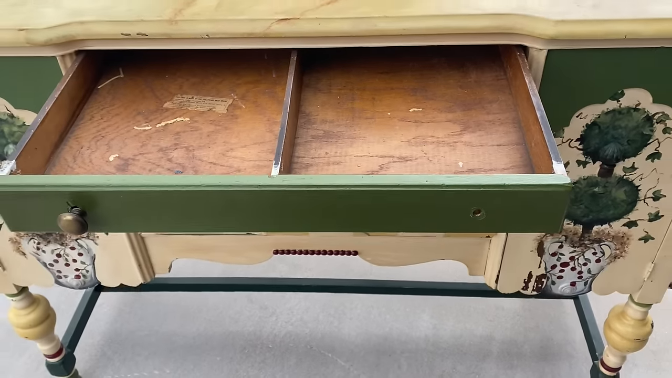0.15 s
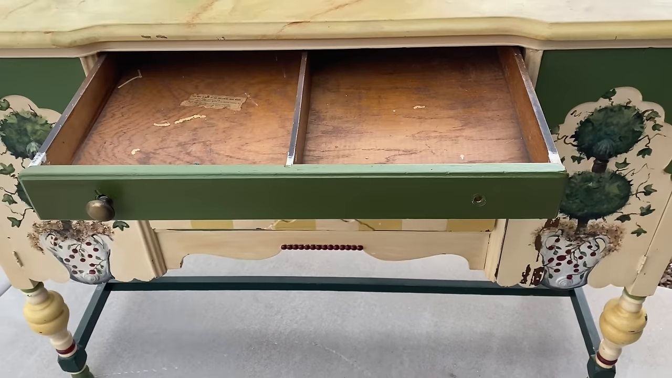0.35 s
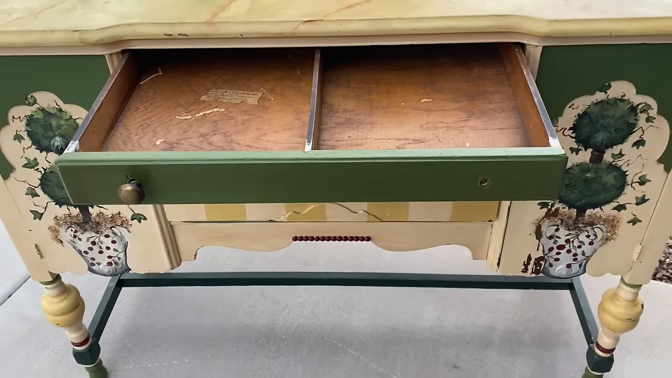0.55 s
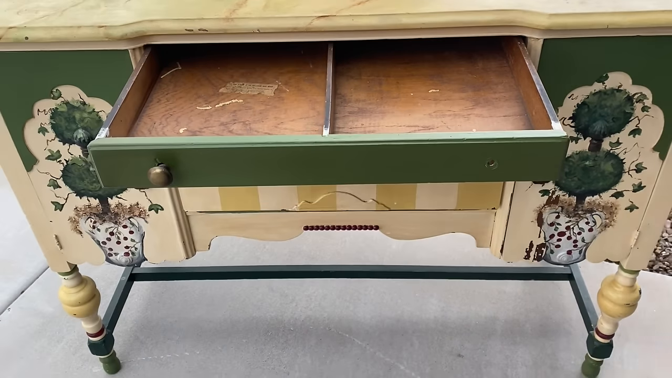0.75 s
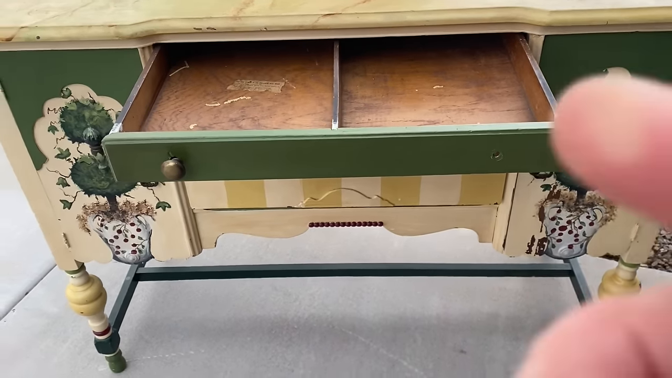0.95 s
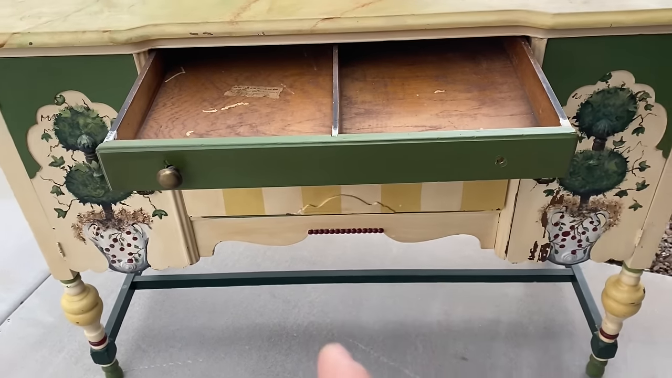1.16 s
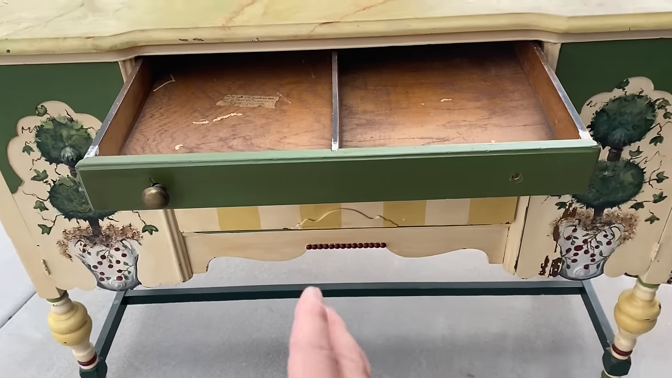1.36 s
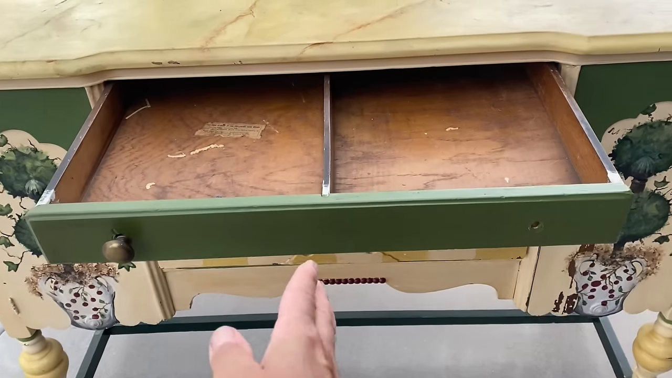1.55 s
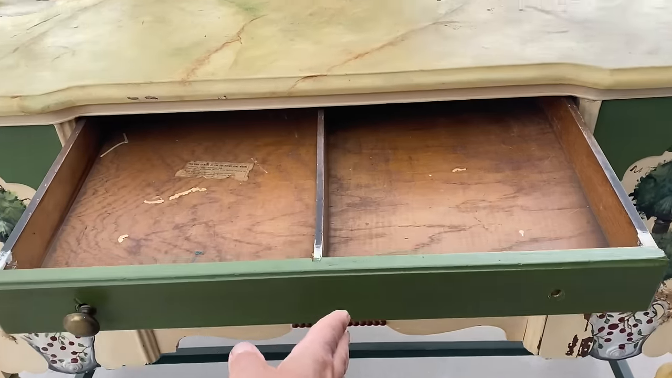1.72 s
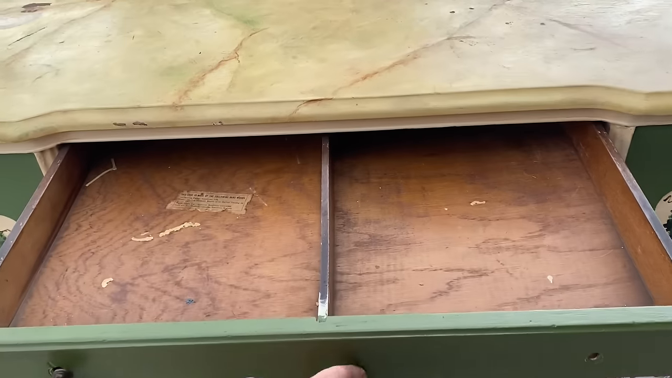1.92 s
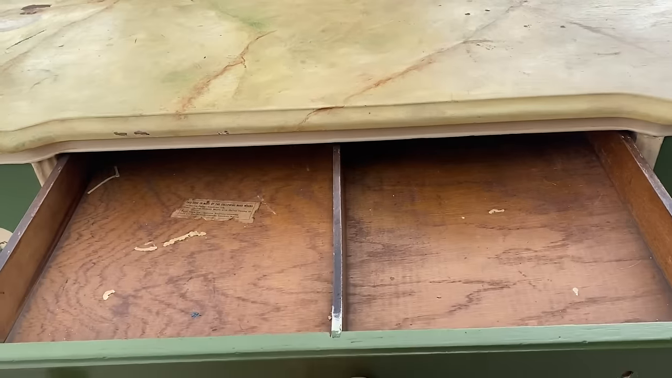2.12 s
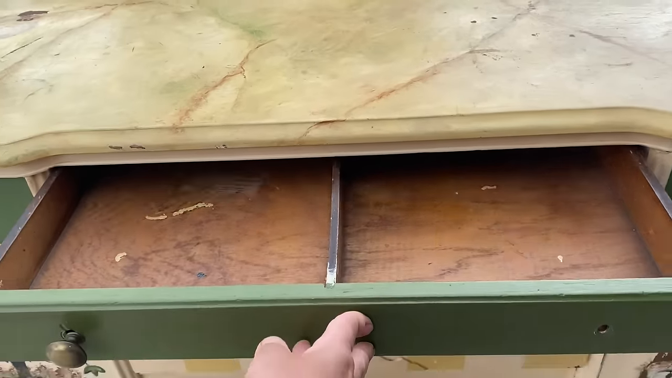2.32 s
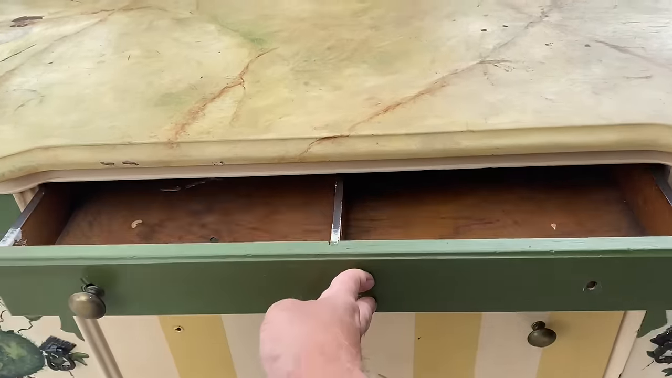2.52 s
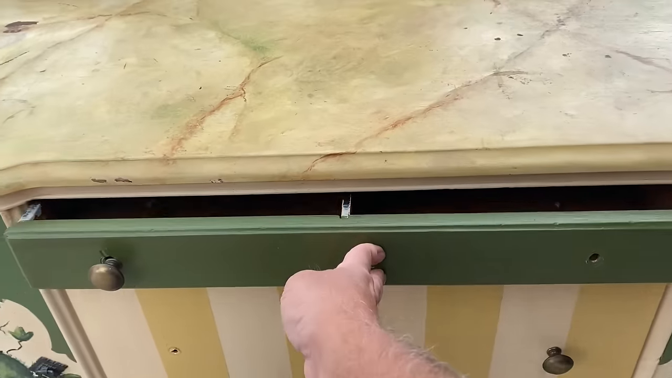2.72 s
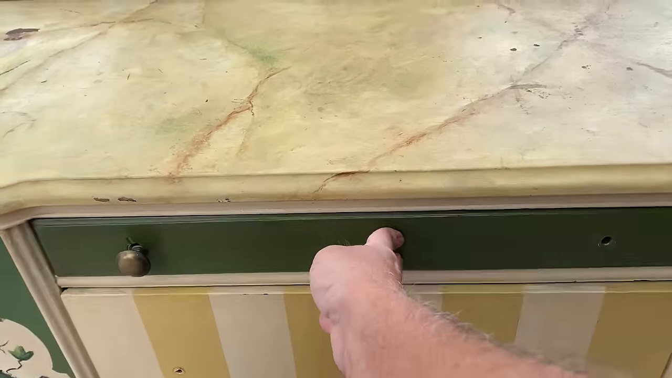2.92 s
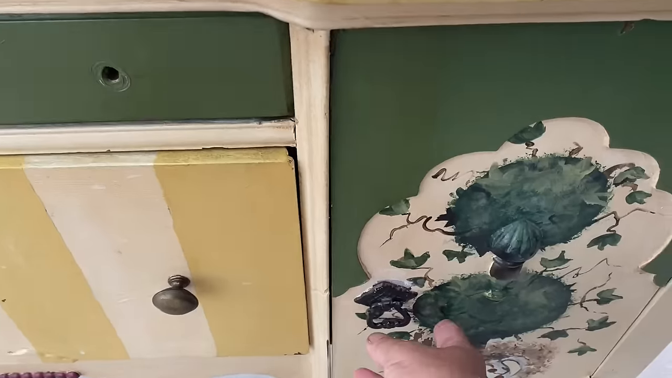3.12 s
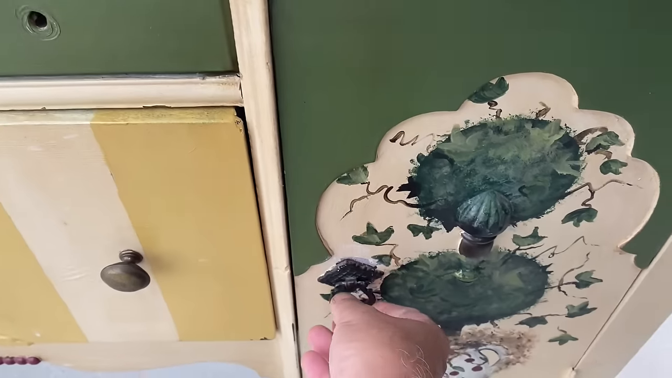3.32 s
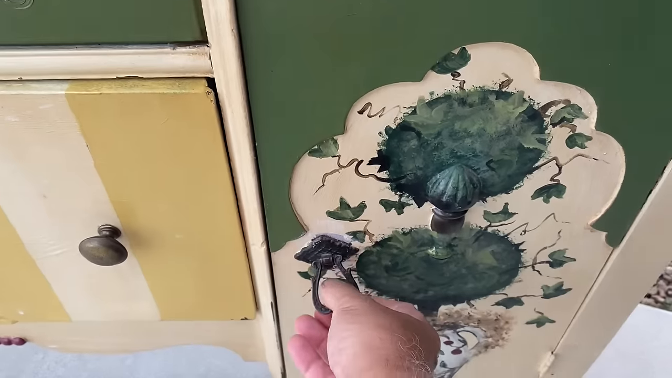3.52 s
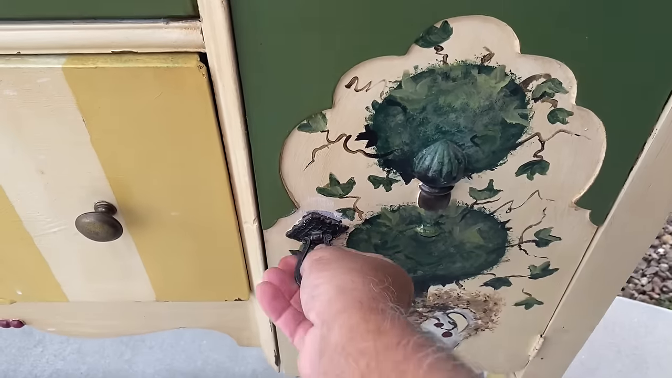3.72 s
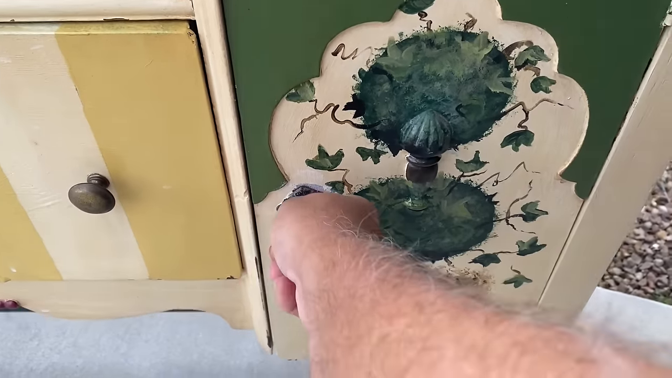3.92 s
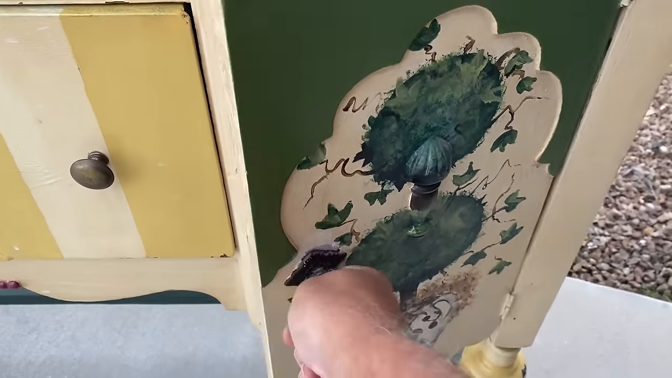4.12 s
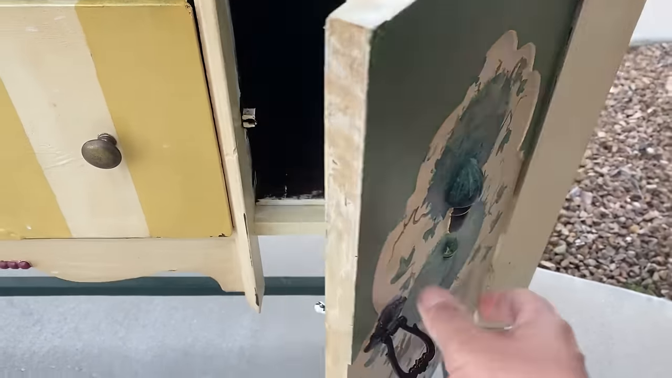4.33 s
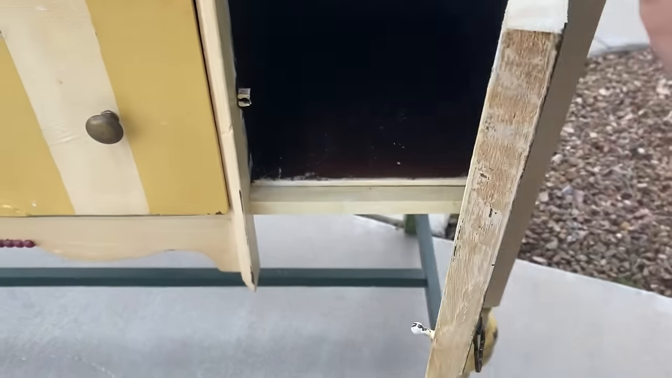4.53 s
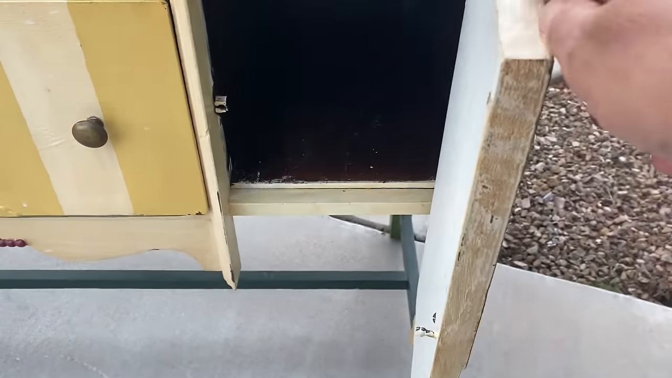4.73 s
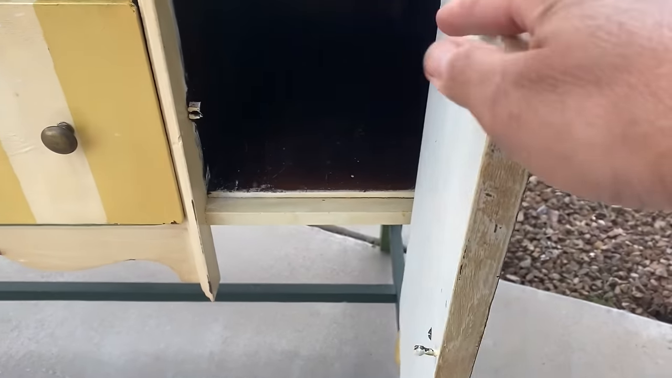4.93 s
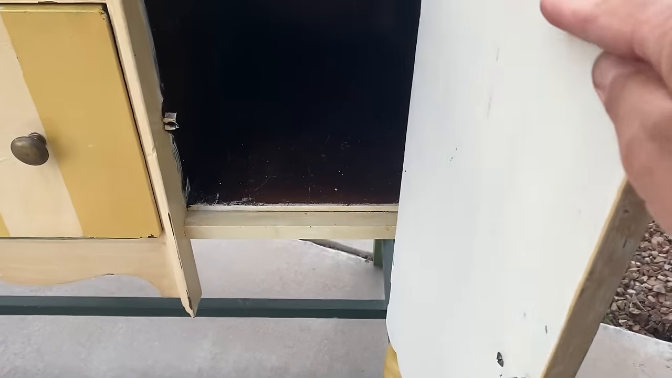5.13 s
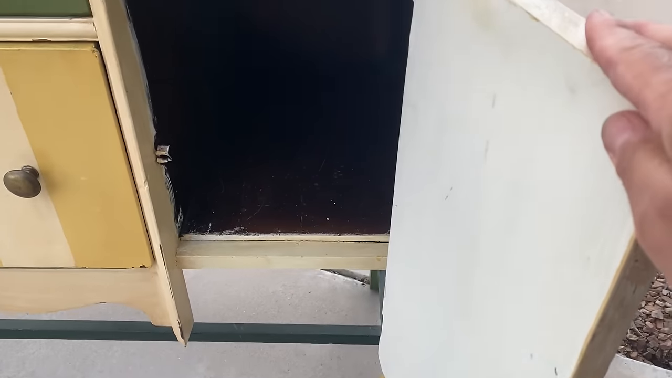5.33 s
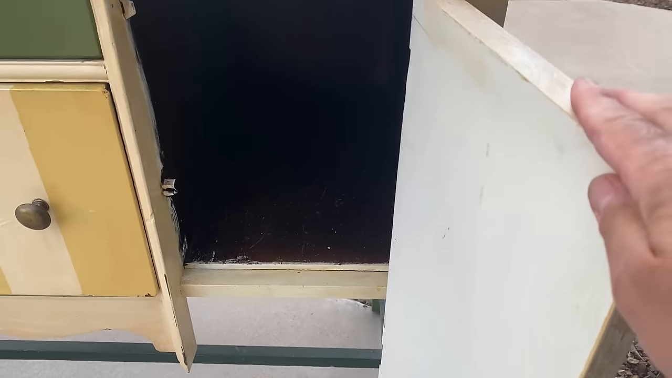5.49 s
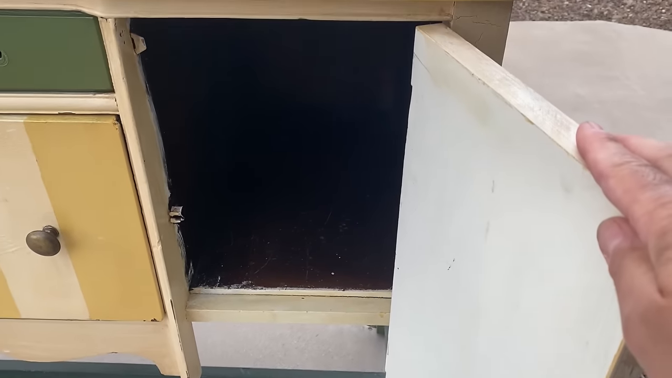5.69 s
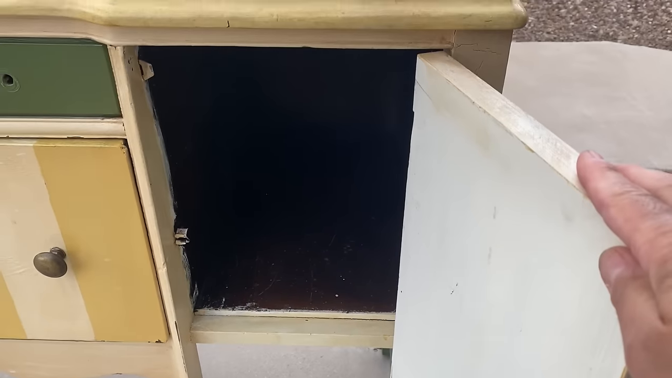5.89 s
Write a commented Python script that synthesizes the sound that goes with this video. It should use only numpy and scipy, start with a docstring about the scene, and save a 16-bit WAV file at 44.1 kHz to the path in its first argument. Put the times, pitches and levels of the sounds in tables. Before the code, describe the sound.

Near-silent open air with low rumble and a faint distant whine. A hand shoves an old drawer: rapid hollow knocks, a grainy slide on wooden runners, a dull closing knock. Light taps on a cabinet door follow, then a cluster of snaps and low shaking as it pulls free, a small metallic clink, a brief edge scrape and a double clack. Close stereo microphone, slight outdoor reflections.

```python
"""An old wooden sideboard on a patio, close to a hand-held stereo microphone, under open air and a far-off whine.
Soft scuffs and brushes come first; then a hand pushes the drawer: struck modes judder, noise drags on the
runners, and the front knocks shut. Fingers tap a door's metal drop pull, the catch snaps and squeaks as the
door is tugged free, the pull clinks in the swing, friction noise scrapes the edge, and the pull drops back."""
import sys
import numpy as np
from scipy import signal
from scipy.fft import rfft, irfft
from scipy.io import wavfile
from scipy.ndimage import uniform_filter1d

SR = 44100
rng = np.random.default_rng(int(sys.argv[2]) if len(sys.argv) > 2 else 0)


def inscribe(sig):
    """Save sig as 16-bit PCM at rate SR to the path in sys.argv[1].

    A 1-D sig is mono; a 2-D sig holds one channel per row.
    Samples are clipped to [-1, 1] before scaling.
    """
    pcm = np.round(np.clip(np.atleast_2d(sig).T, -1, 1) * 32767)
    wavfile.write(sys.argv[1], SR, pcm.astype(np.int16))


N = 267069
TIME, BINS = np.arange(N) / SR, np.fft.rfftfreq(N, 1 / SR)
DRAWER_TRIM_DB, DOOR_TRIM_DB = -3.5, -5.0  # applied on top of the blow levels in the tables
# In all tables, mode and spectrum levels are relative: they set colour, not loudness.

# drawer jamming and striking its frame: [t/s, knock level/dB, click level/dB]
DRAWER_KNOCKS = [(1.993, -40, -44), (2.074, -28.5, -40), (2.241, -16, -34.5), (2.267, -12.5, -21.5),
                 (2.315, -11.5, -30.5), (2.331, -15.5, -24), (2.410, -21, -38), (2.415, -13.5, -26.5),
                 (2.852, -33.5, -44)]
# two rebounds of each blow, softer and duller: [delay t/s, knock level change/dB, click level change/dB]
DRAWER_REBOUNDS = [(.0098, -3, -13.5), (.027, -12.5, -25)]
# drawer and frame modes: [f/Hz, level/dB, t60/s]
DRAWER_MODES = [(66.4, -15, 0.44), (108.1, -5.5, 0.18), (125.6, -1.5, 0.22), (169.6, -7, 0.18),
                (207, -5, .17), (330.5, 3.5, 0.077), (380.7, -2, 0.21), (489.6, 0, 0.12), (592.3, -3, 0.16),
                (650, -9, 0.096), (759, -9, 0.14), (951, -13.5, .12), (1139, -8, 0.13), (1234, -4.5, 0.066),
                (1369, -15, 0.099), (1887, -10, 0.11), (2247, -16.5, 0.19), (2360, -15.5, 0.069)]
# many close modes between those: [f/Hz, level/dB per Hz]
DRAWER_WOOD = [(40, -21.5), (115, 2), (270, -8.5), (460, 0.5), (800, -9.5), (1200, -10), (1600, -15),
               (2500, -14), (3500, -18.5), (6000, -19.5), (10000, -26), (14000, -31.5)]
# ring time of the close modes, also for the closing front: [f/Hz, t60/s]
DRAWER_T60 = [(100, 0.16), (500, 0.2), (1500, 0.11), (4000, 0.077), (12000, 0.029)]


def drawer_judder():
    """The jammed drawer strikes its frame and rocks back; heavy blows also move the carcass."""
    thud_db, thud_growth = 5, 1.41  # the thud grows faster than the knock
    rows = [(s, knock_db, thud_db + thud_growth * knock_db, click_db)
            for s, knock_db, click_db in rebounding(DRAWER_KNOCKS, DRAWER_REBOUNDS)]
    blows = knocks(rows, DRAWER_MODES, DRAWER_WOOD, DRAWER_T60, wood_db=1, crack_db=-12.5, bloom_s=0.0042)
    return amp(DRAWER_TRIM_DB) * blows


# push that builds, then eases as the drawer runs home: [t/s, effort level/dB]
PUSH = [(2.1, -23), (2.33, -1.5), (2.66, -6.5), (2.97, -18)]
# low body of the sliding drawer: [f/Hz, level/dB per Hz]
RUNNER_RUMBLE = [(24, -41.5), (40, -15.5), (59, -6.5), (129, -6), (162, -1), (241, -11), (314, -16.5),
                 (345, -12), (394, -17.5), (434, -22), (483, -21.5), (700, -24.5), (910, -52.5),
                 (1540, -120)]
# dry friction of the runners: [f/Hz, level/dB per Hz]
RUNNER_HISS = [(60, -16.5), (400, -8), (650, 5.5), (900, -1.5), (1350, 2), (1750, -2), (2200, -5),
               (3300, -11.5), (5000, -10.5), (7300, -12), (9200, -22), (11000, -12.5), (14000, -21)]


def drawer_runners():
    """Dry wood drags on its runners: uneven friction drives a rumble and a hiss that follow the push."""
    rumble_db, hiss_db = -26, -43  # at 0 dB effort
    hiss_growth = 0.54  # dB of hiss per dB of effort
    effort = level(PUSH)
    rumble = noise(RUNNER_RUMBLE, grain=slips(per_s=60, spread_db=1.5))
    fibres = slips(per_s=500, spread_db=2.0)
    rough_patches = slips(per_s=69, spread_db=0.2)
    hiss = panel(noise(RUNNER_HISS, grain=fibres * rough_patches), t60=0.033, ring_db=-4)
    return amp(rumble_db) * effort * rumble + amp(hiss_db) * effort ** hiss_growth * hiss


# drawer front shutting: a first touch, the main knock, its rebounds and a late latch tick:
# [t/s, knock level/dB, thud level/dB, click level/dB]
DRAWER_SHUTS = [(2.952, -31.5, -25, -46), (2.970, -15, -23, -34), (2.983, -17.5, -25, -47),
                (3.012, -35.5, -24, -76), (3.1, -67, -69, -52.5)]
# modes of the drawer front: [f/Hz, level/dB, t60/s]
FRONT_MODES = [(86, 4.5, 0.074), (137.7, -1.5, 0.14), (220, -2, 0.33), (275, -32, 0.1), (380, -4, 0.14),
               (477, 6.5, 0.09), (507, 1, 0.048), (656, -6, 0.15), (876, -12, 0.19), (1050, -11.5, 0.15),
               (1256, -13, 0.15), (1293, -5, 0.086), (1890, -13.5, 0.055)]
# close modes of the drawer front: [f/Hz, level/dB per Hz]
FRONT_WOOD = [(40, -23), (100, 4.5), (220, 4), (500, -5.5), (800, -18), (1300, -17), (2200, -22.5),
              (3500, -40), (9000, -36), (14000, -46)]


def drawer_shut():
    """The front touches, knocks shut, rebounds and ticks late; each blow rings its modes."""
    blows = knocks(DRAWER_SHUTS, FRONT_MODES, FRONT_WOOD, DRAWER_T60,
                   wood_db=6, crack_db=-23.0, bloom_s=0.00027)
    return amp(DRAWER_TRIM_DB) * blows


# fingers tapping the pull against the shut door: [t/s, knock level/dB, click level/dB]
PULL_TAPS = [(3.31, -46.5, -64), (3.459, -34, -67), (3.618, -27.5, -42), (3.74, -26, -37),
             (3.92, -35.5, -53)]
# one swing back of the pull after each tap: [delay t/s, knock level change/dB, click level change/dB]
PULL_REBOUNDS = [(0.047, -13, -17)]
# modes of the shut door: [f/Hz, level/dB, t60/s]
SHUT_DOOR_MODES = [(246.5, -4, 0.26), (444, -11.5, 0.13), (683, -6, 0.11), (940, -4.5, 0.049),
                   (1387, 0, 0.044), (1550, 2, 0.029), (1840, -12, 0.19), (3110, -8, .04),
                   (4070, -4.5, 0.021), (5430, -11, 0.037)]
# close modes behind every door blow: [f/Hz, level/dB per Hz]
DOOR_WOOD = [(60, -3.5), (200, -5), (500, 2.5), (1000, -6), (1900, -1.5), (3300, -11.5), (5000, -9.5),
             (8000, -16), (14000, -20.5)]
# ring time of those close modes: [f/Hz, t60/s]
DOOR_T60 = [(150, 0.2), (600, 0.081), (2000, 0.11), (5000, 0.07), (12000, .025)]


def pull_taps():
    """The pull taps the shut door, whose modes ring, and swings back once more softly."""
    rows = rebounding(PULL_TAPS, PULL_REBOUNDS)
    blows = knocks(rows, SHUT_DOOR_MODES, DOOR_WOOD, DOOR_T60, wood_db=0.0, crack_db=1.0, bloom_s=0.00056)
    return amp(DOOR_TRIM_DB) * blows


# door jerking out of its spring catch and jolting on its hinges:
# [t/s, knock level/dB, thud level/dB, click level/dB]
CATCH_SNAPS = [(3.965, -38, -50, -50), (3.979, -27.5, -39.5, -44), (3.989, -23.5, -20.5, -34),
               (4.008, -26, -15, -45), (4.025, -19, -27, -37), (4.048, -26, -48, -44),
               (4.237, -38, -29.5, -52.5)]
# modes set off by the catch: [f/Hz, level/dB, t60/s]
CATCH_MODES = [(97.4, -1, 0.245), (110.5, 2, 0.35), (178.3, -1.5, 0.17), (211.8, -12.5, 0.298),
               (380, 9, 0.03), (466, -1, 0.13), (973, -3.5, 0.11), (1630, -14, 0.011), (1820, -2, 0.16),
               (2017, 5.5, 0.058), (2310, -5, 0.099), (4200, 10, 0.029)]


def catch_snaps():
    """The spring catch lets go in a run of hard blows that jolt the door."""
    blows = knocks(CATCH_SNAPS, CATCH_MODES, DOOR_WOOD, DOOR_T60, wood_db=5.5, crack_db=12.5, bloom_s=0.0013)
    return amp(DOOR_TRIM_DB) * blows


# squeak of the slipping catch: [t/s, centre f/Hz, level/dB]
SQUEAK = [(3.962, 2204, -60.5), (3.972, 2675, -48), (3.983, 2860, -50), (3.992, 2430, -30.5),
          (4.0, 2375, -33), (4.022, 2320, -63)]


def squeak():
    """The metal catch sings with an unsteady pitch while it slides."""
    s, hz, _ = np.transpose(SQUEAK)
    waver = 1 + 0.039 * evened(uniform_filter1d(rng.standard_normal(N), size=40))
    angle = 2 * np.pi * np.cumsum(np.interp(TIME, s, hz) * waver) / SR
    tone = np.sqrt(2) * np.sin(np.array([angle, angle + np.pi / 4]))  # the two ports sit out of step
    return level(SQUEAK, axis=2) * tone


# low boom, shared by the shaking hinges and the handling bumps: [f/Hz, level/dB per Hz]
LOW_BOOM = [(40, 0.5), (100, 2.5), (170, -5.5), (260, -17.5), (400, -19), (900, -41), (2000, -68.5)]


def hinge_shake():
    """The freed door shakes on its hinges, less and less: a fluttering low rumble."""
    shake = amp(-31.5) * envelope(start_s=3.93, rise_s=0.036, hold_s=0, fall_db_per_s=34)
    return shake * noise(LOW_BOOM, grain=slips(per_s=120, spread_db=0.5))


# pull clinking in its mount as the door swings: [t/s, knock level/dB, click level/dB]
PULL_CLINKS = [(4.299, -60, -42.5), (4.345, -43, -56), (4.3811, -33, -39), (4.393, -25.5, -32.5)]
# modes of the metal pull: [f/Hz, level/dB, t60/s]
PULL_MODES = [(351, -12.5, 0.24), (860, -15.5, 0.22), (1233, -6.5, 0.063), (1640, -13, 0.086),
              (1910, -5, 0.16), (1995, 7.5, 0.041), (2118, -1.5, 0.12), (2344, -0.5, 0.073),
              (3377, -12.5, .06), (4360, -7.5, 0.052)]
# colour of the trembling pull: [f/Hz, level/dB per Hz]
JINGLE = [(500, -18), (1200, -10), (1650, -9), (1930, 6), (2100, 0), (2380, -10.5), (2800, -34.5),
          (4400, -11), (6000, -29), (14000, -57.5)]


def pull_clinks():
    """The pull strikes its mount, then trembles on as a dying jingle of uneven noise."""
    blows = knocks(PULL_CLINKS, PULL_MODES, DOOR_WOOD, DOOR_T60, wood_db=-3, crack_db=-14, bloom_s=0.0023)
    tremble_db = -39.5  # relative to the knock level in the table
    tremble = sum(amp(knock_db + tremble_db) * envelope(s, rise_s=0.0043, hold_s=0, fall_db_per_s=35)
                  for s, knock_db, _ in PULL_CLINKS)
    jingle = noise(JINGLE, grain=slips(per_s=200, spread_db=3))
    return amp(DOOR_TRIM_DB) * blows + tremble * jingle


# loose pull dropping on the open door and bouncing: [t/s, knock level/dB, click level/dB]
PULL_DROPS = [(4.972, -18, -29), (4.978, -19, -25)]
# modes of the open door: [f/Hz, level/dB, t60/s]
OPEN_DOOR_MODES = [(370, -14, 0.26), (452, -14, 0.11), (650, -13, 0.062), (818, -7, .08), (1004, -2, 0.096),
                   (1193, 2.5, 0.066), (1218, 6.5, 0.055), (1730, 1.5, 0.066), (1950, -5, 0.12),
                   (2640, -1, 0.029), (3040, 2, 0.033), (4350, -12, 0.079), (4970, -9, .05),
                   (6900, -12.5, 0.037), (7270, -17, 0.091)]


def pull_drops():
    """The falling pull hits the open door panel and rings its modes."""
    blows = knocks(PULL_DROPS, OPEN_DOOR_MODES, DOOR_WOOD, DOOR_T60,
                   wood_db=-2.5, crack_db=-20.0, bloom_s=0.00077)
    return amp(DOOR_TRIM_DB) * blows


# colour of the scraped door edge: [f/Hz, level/dB per Hz]
EDGE = [(100, -17), (205, 6.5), (290, 4.5), (370, 9.5), (430, -6.5), (600, 4.5), (800, 2), (1080, -3.5),
        (1550, 2.5), (2200, -0.5), (3200, -4), (7000, -6.5), (12000, -11), (14500, -17.5)]


def edge_scrape():
    """The hand catches and slips along the door edge: each slip is a burst of friction that decays."""
    slip_rate = 168 * slips(per_s=160, spread_db=2.5)  # Hz
    since_slip = np.cumsum(slip_rate) / SR % 1  # share of each uneven slip cycle
    chatter = (0.5 + np.exp(-since_slip / 0.15)) * slips(per_s=270, spread_db=3)
    pressure = amp(-33.5) * envelope(start_s=4.741, rise_s=0.01, hold_s=0.056, fall_db_per_s=599)
    return pressure * panel(noise(EDGE, grain=chatter), t60=0.062, ring_db=-5)


# skin brushing over paint: [start t/s, length t/s, level/dB]
BRUSHES = [(1.354, 0.42, -74), (1.895, 0.092, -50.5), (1.95, 0.16, -63.5), (3.495, 0.08, -56),
           (3.968, 0.063, -46), (4.571, 0.077, -66), (4.79, 0.35, -67.5), (5.29, 0.1, -75)]
# colour of skin on paint: [f/Hz, level/dB per Hz]
SKIN = [(300, -0.5), (1500, -2), (3000, 0), (5000, -1), (8000, -5), (12500, -5.5), (14500, -12.5)]


def skin_brush():
    """Skin strokes the paint, and rustles lightly on the door between strokes."""
    rustle = amp(-75) * envelope(start_s=3.08, rise_s=0.019, hold_s=1.97, fall_db_per_s=52)
    fidget = slips(per_s=14, spread_db=4.5)  # wanders around the rustle level
    friction = panel(noise(SKIN, grain=slips(per_s=180, spread_db=2.5)), t60=.03, ring_db=3.0)
    return (strokes(BRUSHES) + rustle * fidget) * friction


# dull scuffs as hand and body move: [start t/s, length t/s, level/dB]
SCUFFS = [(.375, 0.047, -58.5), (.655, 0.09, -62.5), (3.3, 0.042, -52.5), (3.495, 0.061, -46),
          (4.583, 0.045, -52), (5.025, 0.015, -48)]
# colour of the scuffs: [f/Hz, level/dB per Hz]
DULL = [(200, 6.5), (500, 2), (1000, 4), (1600, 0.5), (2400, -6.5), (4500, -20.5), (12000, -24)]
# low bumps of handling: [start t/s, length t/s, level/dB]
BUMPS = [(1.8, 0.34, -48), (3.04, 0.095, -44), (3.25, 0.6, -48.5)]


def scuffs_and_bumps():
    """Moving hand and body: short grainy dull noises, and soft swells of low noise."""
    scuff = strokes(SCUFFS) * noise(DULL, grain=slips(per_s=150, spread_db=4.5))
    return scuff + strokes(BUMPS) * noise(LOW_BOOM)


# faint, dull tocks of unknown cause: [t/s, f/Hz, level/dB]
TOCKS = [(1.435, 500, -40.5), (5.267, 1040, -40.5)]


def tocks(t60=0.02):
    """Each is one heavily damped mode with a soft start."""
    out = np.zeros(N)
    for s, hz, db in TOCKS:
        t = np.maximum(TIME - s, 0)
        out += amp(db - 60 * t / t60) * np.tanh(t / 0.0017) * np.sin(2 * np.pi * hz * t)
    return out


# colour of the patio reflections: [f/Hz, level/dB per Hz]
PATIO_COLOUR = [(60, 4.5), (400, -3.5), (3000, -1.5), (14000, -3)]
# dying of the patio reflections: [f/Hz, t60/s]
PATIO_T60 = [(100, 0.55), (1000, 0.53), (4000, 0.73), (12000, .35)]


def patio(x, size=30000):
    """Paving and house wall return a thin, short tail: sparse random echoes, each frequency dying alone."""
    taps = (rng.random((2, size)) < .06) * (TIME[:size] > .006)
    tail = dying(noise(PATIO_COLOUR, size, grain=taps), PATIO_T60)
    return signal.fftconvolve(x, tail / np.linalg.norm(tail[0]), axes=1)[:, :N]


# colour of the outdoor air: [f/Hz, level/dB per Hz]
AIR = [(13, -47.5), (22, -19.5), (46, -0.5), (73, 0.5), (129, -8), (223, -13.5), (374, -22.5), (779, -22.5),
       (1670, -36), (2130, -35.5), (4830, -50.5), (7270, -52.5), (8800, -62), (11900, -47.5), (14800, -61)]
# hiss of the air over time: [t/s, level/dB]
AIR_HISS = [(0, -67.5), (.7, -64.5), (1.05, -74), (1.9, -67.5), (5.1, -64.5), (5.6, -72.5), (6.06, -72.5)]
# far-off whine, swelling and fading: [start t/s, length t/s, level/dB]
WHINES = [(.8, 1, -67)]
# colour of the whine: [f/Hz, level/dB per Hz]
WHINE = [(400, -35), (700, -11), (800, -2.5), (930, -11), (1500, -25), (5000, -70)]


def air():
    """Low rumble of the neighbourhood, a faint hiss and a far-off whine, all shaped noise."""
    outdoors = noise(AIR, grain=slips(per_s=7.5, spread_db=0.1))
    low = signal.sosfiltfilt(signal.butter(2, 450, fs=SR, output="sos"), outdoors)
    rumble = amp(-51) * evened(low)
    hiss = level(AIR_HISS) * evened(outdoors - low)
    return rumble + hiss + strokes(WHINES) * noise(WHINE)


# likeness of the two ports: [f/Hz, left-right correlation]
LIKENESS = [(120, 0.97), (300, 0.93), (700, 0.62), (1400, 0.39), (2500, 0.32), (6000, .35), (8300, 1),
            (10200, 1), (13000, 0.88)]


def knocks(rows, modes, wood, t60s, wood_db, crack_db, bloom_s, size=22050):
    """Each blow rings the modes and the wood; its row sets the levels of knock, optional thud and click."""
    out, t = np.zeros((2, N)), np.arange(size) / SR
    hz, db, t60 = np.transpose(modes)[:, :, None]
    apart = np.arccos(np.clip(read(LIKENESS, hz), -1, 1)) / 2  # less alike modes reach the ports out of step
    for s, knock_db, *thud, click_db in rows:
        spot, side, sign, grip = rng.standard_normal((4, len(modes), 1))
        angle = 2 * np.pi * hz * (1 + 0.0092 * grip) * t  # the grip shifts the modes a little
        phase = np.array([apart, -apart]) * np.sign(side)
        strength = np.sign(sign) * amp(db + 1.3 * spot - 60 * t / t60)  # the struck spot varies the modes
        ring = (strength * np.sin(angle + phase)).sum(1)
        contact = 1 + amp(crack_db) * np.exp(-t / 0.0012)
        blow = ring + amp(wood_db) * dying(noise(wood, size), t60s) * contact
        bloom = 1 - np.exp(-t / bloom_s)  # the blow spreads through the panel
        body = band(blow * bloom, [300, 3000] if thud else [150, 3000], "bandpass", size=24)
        click = band(blow, 3000, "highpass", size=150)
        sound = amp(knock_db) * body + amp(click_db) * click
        for thud_db in thud:
            swell = 1 - np.exp(-t / 0.0052)  # heavy parts take a moment to move
            sound += amp(thud_db) * band(blow * swell, 300, "lowpass", size=200)
        add(out, s, sound)
    return out


def rebounding(blows, rebounds):
    """Follows every blow with its rebounds."""
    hits = [(0, 0.002, 0.0056)] + list(rebounds)  # the blow itself comes first
    return [(s + delay, knock_db + softer, click_db + duller)
            for s, knock_db, click_db in blows for delay, softer, duller in hits]


def panel(x, t60, ring_db, size=3000):
    """Friction heard directly and through the close modes of the board, which ripple its spectrum."""
    ring = rng.standard_normal(size) * amp(-60 * TIME[:size] / t60)
    rung = signal.oaconvolve(x, ring[None] / np.linalg.norm(ring), axes=1)[:, :N]
    return evened(x + amp(ring_db) * rung)


def slips(per_s, spread_db):
    """Uneven stick-slip force: gliding between new random grips many times a second."""
    grips = rng.standard_normal(N)
    return amp(spread_db * np.interp(TIME * per_s, np.arange(N), grips))


def noise(spectrum, size=N, grain=1):
    """Coloured stereo noise at rms 1, as alike in the ports as LIKENESS says; grain is the driving force."""
    hz = np.fft.rfftfreq(size, 1 / SR)
    left, other = rfft(rng.standard_normal((2, size)) * grain)
    same = np.clip(read(LIKENESS, hz), -1, 1)
    pair = np.array([left, same * left + np.sqrt(1 - same ** 2) * other])
    return evened(irfft(pair * amp(read(spectrum, hz)), size))


def dying(x, t60s):
    """Lets each frequency die at its own speed."""
    hz, t, z = signal.stft(x, SR, nperseg=128)
    fade = amp(-60 * t / np.maximum(read(t60s, hz), .005)[:, None])
    return signal.istft(z * fade, SR, nperseg=128)[1][:, :x.shape[1]]


def band(x, hz, kind, size):
    """Causal filter, scaled so that the loudest stretch of size samples has rms 1."""
    x = signal.sosfilt(signal.butter(3, hz, kind, fs=SR, output="sos"), x)
    power = uniform_filter1d((x ** 2).mean(0), size=size, mode="constant")
    return x / np.sqrt(power.max())


def strokes(rows, skew=0.68):
    """Each stroke swells quickly and fades more slowly."""
    return sum(amp(db) * np.sin(np.pi * np.clip((TIME - s) / length, 0, 1) ** skew) for s, length, db in rows)


def envelope(start_s, rise_s, hold_s, fall_db_per_s):
    """Rises, holds, then dies at a steady rate."""
    age = TIME - start_s
    return np.clip(age / rise_s, 0, 1) * amp(-fall_db_per_s * np.maximum(age - rise_s - hold_s, 0))


def level(rows, axis=1):
    """A dB column of a curve as a gain, silent outside the curve."""
    rows = np.array(rows)
    return amp(np.interp(TIME, rows[:, 0], rows[:, axis], left=-200, right=-200))


def read(points, hz):
    """Reads a table along a log-frequency axis."""
    f, value = np.transpose(points)
    return np.interp(np.log(hz + 1), np.log(f + 1), value)


def add(mix, s, sound):
    """Adds a stereo sound at time s."""
    part = mix[:, round(s * SR):][:, :sound.shape[1]]
    part += sound[:, :part.shape[1]]


def evened(x):
    """Scales to rms 1."""
    return x / np.sqrt(np.mean(x ** 2) + 1e-20)


def amp(db):
    """Decibels to gain."""
    return 10 ** (np.asarray(db) / 20)


def scene():
    """The sideboard, the hand and the faint tocks, their echo and the open air."""
    drawer = drawer_judder() + drawer_runners() + drawer_shut()
    door = pull_taps() + catch_snaps() + squeak() + hinge_shake() + pull_clinks() + pull_drops()
    hand = edge_scrape() + skin_brush() + scuffs_and_bumps()
    near = drawer + door + hand + tocks()
    return near + amp(-21.0) * patio(near) + air()


# colour difference of the two ports: [f/Hz, left-right level/dB]
LEAN = [(60, 2.5), (110, -0.5), (200, 2), (370, 2), (680, -1.5), (1260, -1.5), (2310, 1.5), (4240, -3),
        (7790, -0.5), (14300, 0)]


def record(dry):
    """The ports differ in colour, the right turns out of phase around 9.2 kHz, and both ends are cut."""
    lean = read(LEAN, BINS) / 2
    left, right = irfft(rfft(dry) * amp([lean, -lean]), N)
    notch = signal.iirnotch(9200, 3.5, fs=SR)
    right = 2 * signal.lfilter(*notch, right) - right  # all-pass: turns phase, keeps level
    bass_cut = signal.butter(3, 52, "highpass", fs=SR, output="sos")
    pair = signal.sosfilt(bass_cut, [left, right])
    treble_cut = signal.firwin(101, 14500, window=("kaiser", 8), fs=SR)
    return signal.oaconvolve(pair, treble_cut[None], "same")


dry = scene()
out = record(dry)
inscribe(out)
```